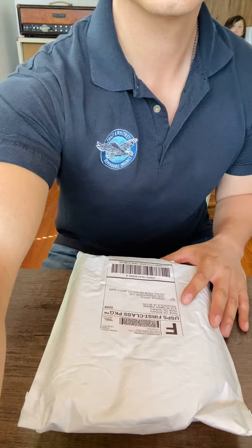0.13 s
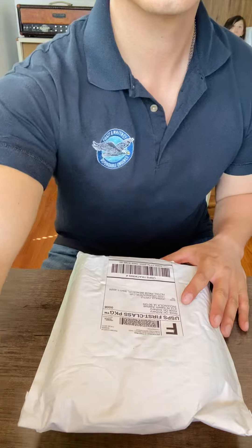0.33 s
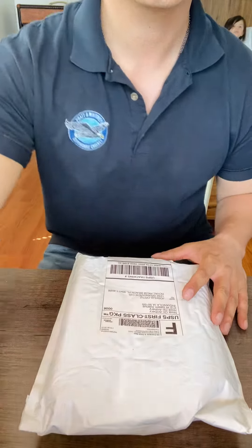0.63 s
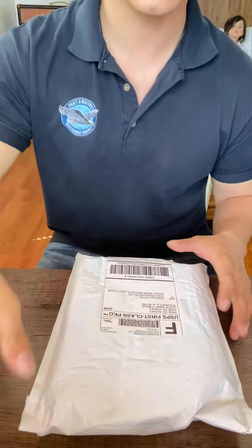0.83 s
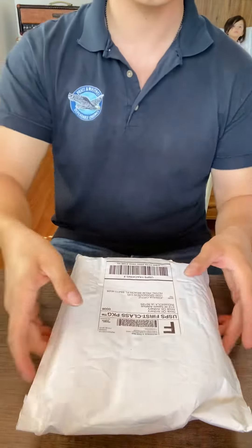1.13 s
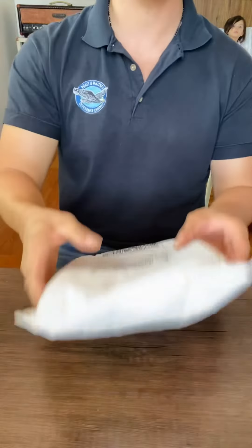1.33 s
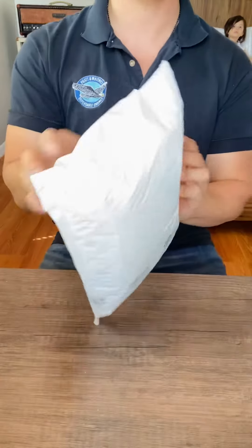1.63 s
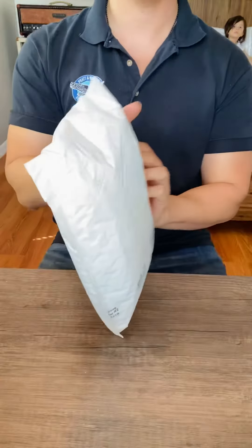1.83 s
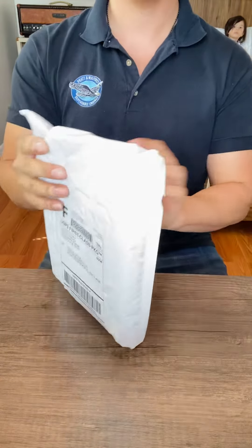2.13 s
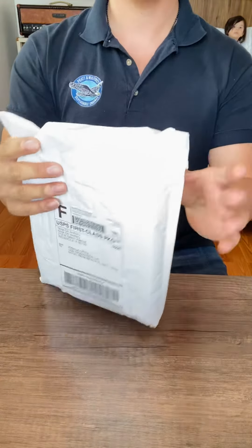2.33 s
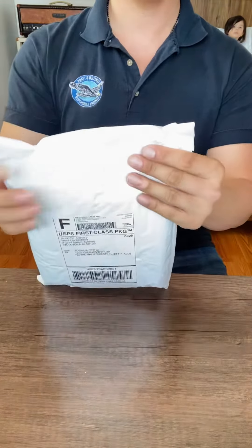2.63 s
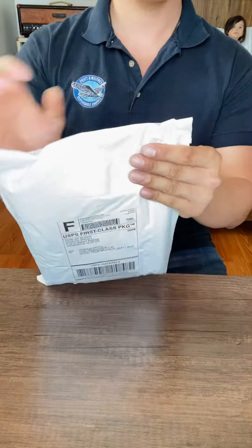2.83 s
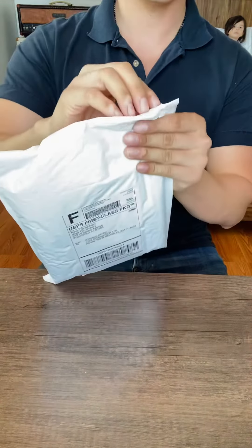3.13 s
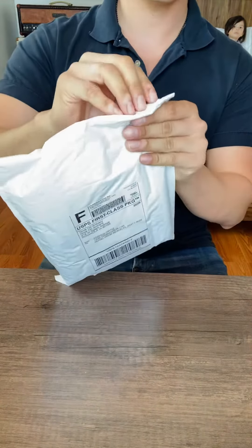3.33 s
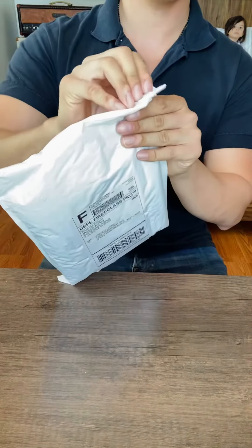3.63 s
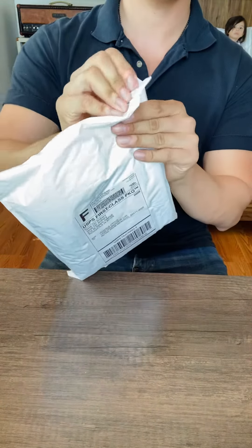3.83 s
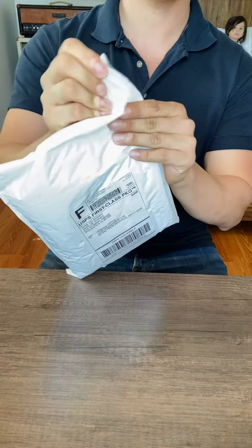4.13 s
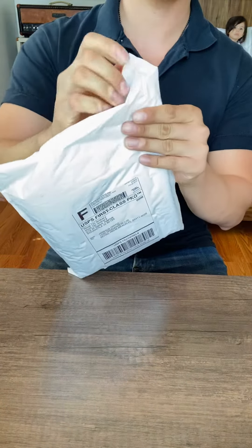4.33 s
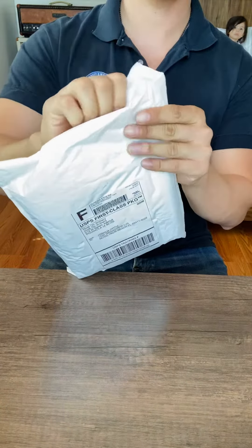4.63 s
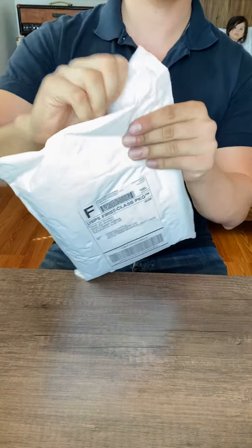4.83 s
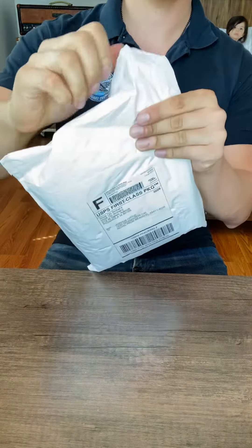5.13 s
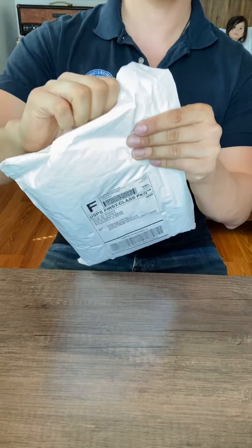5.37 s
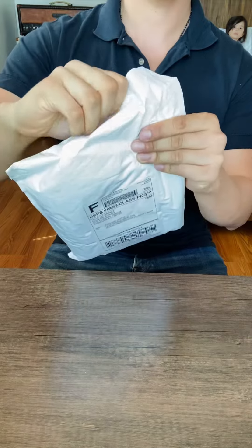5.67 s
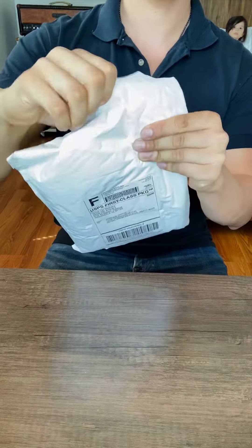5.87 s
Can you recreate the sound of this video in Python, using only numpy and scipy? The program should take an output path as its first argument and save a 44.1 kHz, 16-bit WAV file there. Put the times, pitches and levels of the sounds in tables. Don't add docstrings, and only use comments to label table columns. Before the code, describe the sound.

After a nearly quiet first second with two small knocks and a whisper of cloth, stiff plastic film crackles and snaps irregularly as hands turn a padded parcel. Fingers pick at the edge, then rip the seam in three short rasping bursts, the later two with soft thumps and hollow air pops. Close and bright, with a short small-room tail.

```python
import sys
import numpy as np
from scipy import signal
from scipy.fft import rfft, irfft
from scipy.io import wavfile
from scipy.ndimage import uniform_filter1d

SR = 44100
rng = np.random.default_rng(int(sys.argv[2]) if len(sys.argv) > 2 else 0)


def inscribe(sig):
    pcm = np.round(np.clip(np.atleast_2d(sig).T, -1, 1) * 32767)
    wavfile.write(sys.argv[1], SR, pcm.astype(np.int16))


def volts_from_decibels(level):
    exponent = np.asarray(level, float) / 20
    return 10 ** exponent


N = 264600

# [f/Hz, level/dB per Hz]
ROOM_TONE = [(28, -16), (49, 4), (97, -1.5), (151, -10), (230, -19.5), (350, -20), (420, -39), (900, -47),
             (2000, -77)]
# [f/Hz, level/dB per Hz]
CLOTH_SPECTRUM = [(500, -3), (950, -13), (1350, -4.5), (1700, -7.5), (2200, -7.5), (7050, -13.5),
                  (13000, -29)]
# [t/s, level/dB]
SLEEVE_PASS = [
    (.04, -83.5),
    (.35, -86),
    (.46, -73),
    (.6, -64.5),
    (.8, -73.5),
    (.97, -80),
    (1.12, -78),
]
# [t/s, peak level/dB, pitch factor/1]
STAND_KNOCKS = [
    (0.0913, -32.5, 0.99),
    (0.189, -33.5, 0.9),
]
# [f/Hz, level/dB, t60/s]
STAND_MODES = [
    (278, 4, 0.058),
    (463, -5.5, 0.1),
    (610, -18, 0.087),
    (915, -16.5, 0.03),
]

# [f/Hz, level/dB per Hz]
FILM_SPECTRUM = [(400, -21), (800, -12.5), (1010, -8), (1370, -1.5), (1770, -4.5), (2030, -2), (2420, -7),
                 (3000, -5), (4100, -5), (5600, -6.5), (7500, -9.5), (10700, -16), (12200, -23.5),
                 (16000, -48)]
# [f/Hz, level/dB per Hz]
PADDING_SPECTRUM = [(88, -38), (150, 2), (177, -4), (334, 0.5), (440, -4), (640, -3), (1100, -8.5),
                    (1430, -10.5), (2420, -120)]
PATCH_PITCHES = [1300, 1500, 2000, 2670, 3300, 4200, 5400, 7300]

# [t/s, peak level/dB, ring f/Hz, relative brightness/dB]
EXTRA_BUCKLES = [(0.38, -63, 1920, -8), (1.113, -52, 1500, -20), (1.17, -34, 1650, -18),
                 (1.625, -29, 1390, -21), (1.529, -35, 1300, -13), (4.846, -27, 3000, -16),
                 (5.6767, -16, 2600, -1), (4.0237, -19, 5640, -12), (4.842, -16.5, 4100, -7),
                 (5.087, -25, 1400, -20), (5.094, -18.5, 2000, -18), (5.5405, -19.5, 3920, 1),
                 (5.6538, -24, 4180, -17), (5.662, -21, 1800, -14), (5.6718, -12, 4100, -7)]
# [t/s, peak level/dB, ring f/Hz, relative brightness/dB]
LIFT_BUCKLES = [(1.1342, -36, 1850, -14), (1.1827, -22.5, 3620, -11), (1.1945, -21, 1640, -2.5),
                (1.3155, -33, 1250, -21), (1.3607, -30, 1120, -8), (1.3954, -22, 1460, -24),
                (1.4115, -25, 5200, -11), (1.4362, -27, 5790, -5), (1.4442, -20.5, 4940, -8),
                (1.475, -26, 5530, -5), (1.5003, -17.5, 3950, -8), (1.54, -19, 2200, -9),
                (1.6343, -32, 1970, -5.5), (1.6635, -31.5, 3300, -3.5), (1.8292, -32, 1410, -10),
                (2.0098, -21, 1350, -29), (2.0167, -21, 2040, -23), (2.0388, -26, 1580, -22.5),
                (2.0559, -13, 1470, -20), (2.1874, -20, 5760, -12), (2.1929, -25.5, 2100, -11),
                (2.3534, -18, 1320, -12.5), (2.393, -30, 5630, -17)]
# [t/s, peak level/dB, ring f/Hz, relative brightness/dB]
TURN_BUCKLES = [(2.52, -21, 7300, 0), (2.5369, -21, 1370, -10), (2.62, -24, 2820, -10),
                (2.6483, -22, 6800, -6), (2.665, -25, 1610, -19), (2.6896, -18.5, 1360, -13),
                (2.7111, -13.5, 1240, -7), (2.719, -16, 5300, -7), (2.7677, -28, 3070, -3),
                (2.802, -20.5, 2900, -13), (2.8472, -29, 1500, -17), (2.8985, -29.5, 1450, -13),
                (2.9127, -33.5, 2710, -2), (3.02, -25.5, 1310, -20), (3.047, -33, 3080, -25),
                (3.074, -26.5, 1450, -19), (3.103, -22, 1320, -6.5), (3.1172, -14, 5860, -11.5),
                (3.1265, -21, 3020, -15), (3.182, -29, 4170, -26), (3.219, -36, 3100, 0),
                (3.297, -31, 2950, -11), (3.3465, -24.5, 3070, -7.5), (3.3786, -21.5, 4320, -13),
                (3.3994, -20.5, 4300, -9), (3.4154, -32, 4300, -8)]
# [t/s, peak level/dB, ring f/Hz, relative brightness/dB]
PICK_BUCKLES = [(3.564, -32.5, 2900, -9), (3.6144, -18, 6700, -7), (3.647, -27, 3060, -14),
                (3.705, -20.5, 2880, -14), (3.7208, -21, 1920, -12), (3.7798, -17, 4200, -6),
                (3.7882, -19, 4150, -8), (3.85, -25, 5270, -2), (3.865, -30, 3020, -9),
                (3.9374, -15, 5100, 1.5), (3.9572, -28, 3380, -12), (3.9688, -17.5, 3160, -15.5),
                (3.981, -20, 1300, -19.5), (4.3279, -23.5, 3000, -17), (4.3322, -22.5, 1450, -5),
                (4.3982, -27.5, 3970, -11), (4.4326, -24, 3580, -17), (4.5002, -27, 1242, -21)]
# [t/s, peak level/dB, ring f/Hz, relative brightness/dB]
PEEL_BUCKLES = [(4.6043, -29, 1470, -16), (4.6264, -21.5, 2080, -7), (4.6361, -24.5, 3530, -13),
                (4.691, -20, 3320, -10), (4.785, -20, 3620, -11), (4.799, -19.5, 3270, -13.5),
                (4.821, -18.5, 4700, -3), (5.0638, -19, 5200, -10.5), (5.1156, -14.5, 2030, -27),
                (5.3016, -29.5, 1385, -8), (5.3157, -27, 1440, -19), (5.3404, -13.5, 3100, -6),
                (5.3696, -29.5, 1610, -33), (5.4174, -25.5, 4820, 5), (5.4487, -30, 2090, -18),
                (5.478, -29, 1480, -23), (5.492, -36, 1370, -18), (5.511, -33, 2000, -23),
                (5.539, -23.5, 1540, -6), (5.5671, -29, 4020, -19), (5.6122, -27, 1400, -7),
                (5.6321, -23.5, 2160, -6)]
# [t/s, peak level/dB, ring f/Hz, relative brightness/dB]
SMALL_BUCKLES = [(1.2846, -37, 1600, 4), (1.322, -35, 3530, -21), (1.3522, -29.7, 4240.0, -6),
                 (1.549, -24, 2840.0, -15), (1.7006, -33, 1420.0, -19), (1.8722, -33.5, 2070, -17),
                 (1.9615, -28.5, 1380.0, -29), (2.184, -39, 2110.0, -5), (2.2005, -37.5, 1460.0, -20),
                 (2.2872, -34, 1510.0, -13.0), (2.3165, -30, 1440.0, -20), (2.541, -21.5, 1230.0, -16),
                 (2.6015, -23, 5360.0, -3), (2.672, -24, 1480, -12), (2.6843, -27, 1210.0, -7.0),
                 (2.744, -30, 4610.0, 3), (2.8161, -31.3, 7940, -7), (3.1435, -30, 1520, -17),
                 (3.1763, -32, 4070.0, -12.0), (3.2252, -41, 3100.0, -9.0), (3.2453, -40, 5400.0, -7.0),
                 (3.2765, -33.4, 2100, -11.0), (3.2918, -34, 2000.0, -7), (3.3941, -27, 5060.0, -8),
                 (3.4627, -34, 2780.0, -8), (3.6587, -35, 3790.0, -15), (3.6817, -36.5, 1960.0, -9.0),
                 (3.9102, -32, 4240.0, -5), (3.991, -25.2, 1460.0, -17), (4.2822, -30, 3060.0, -9),
                 (4.426, -30.5, 1640.0, -17), (4.545, -40, 4340, -4), (4.6, -37, 1400.0, -18.0),
                 (4.6564, -32.7, 2050, -11), (4.716, -23, 2780.0, -25), (4.8042, -27, 1340.0, -16),
                 (4.8316, -27, 2910.0, -5), (5.2799, -30, 1350, -13), (5.351, -24, 2540.0, -16),
                 (5.361, -29, 1530, -24), (5.4064, -28, 1280, -28), (5.436, -31, 1260, -19),
                 (5.5317, -32, 1310.0, -13), (5.5506, -24, 1980.0, -21), (5.5745, -34, 1770.0, -14.0),
                 (5.6007, -34, 7150.0, -4.0), (5.6181, -36, 1510.0, -12), (5.9976, -29, 1490.0, -21)]

# [t/s, peak level/dB, f/Hz, t60/s]
JOLTS = [(0.612, -49, 205, 0.13), (1.146, -38.5, 219, 0.075), (0.598, -50, 306, 0.11),
         (1.141, -39, 359, 0.11), (1.827, -37, 89.5, 0.062), (2.052, -41, 130, 0.21),
         (2.554, -34, 85, 0.086), (2.522, -45, 154, 0.052), (3.297, -42, 520, 0.055), (3.613, -40, 91, 0.1),
         (3.805, -35.5, 325, 0.033), (4.104, -36, 329, 0.15), (4.339, -31.5, 121, 0.034),
         (4.853, -30, 199, 0.19), (4.889, -20.5, 324, 0.052), (5.119, -23.5, 124, 0.044),
         (5.679, -18, 216, 0.025), (5.695, -22.5, 317, 0.12), (5.935, -19, 106, 0.032)]
# [t/s, peak level/dB, f/Hz]
AIR_POPS = [(0.6107, -51, 364), (0.6277, -49, 370.0), (1.3555, -35, 790), (1.4166, -31, 650),
            (2.0558, -31.5, 683), (2.7115, -36, 457), (2.847, -45, 630), (3.0853, -41.5, 570),
            (3.2977, -47.5, 517), (3.5768, -49, 370.0), (3.7047, -48, 586), (3.7345, -43.4, 733),
            (4.0058, -42, 604), (4.1929, -43, 765), (4.334, -41.5, 370.0), (4.3974, -45.5, 367),
            (4.4314, -45, 980), (4.5015, -45.5, 374), (4.6312, -45, 820.0), (4.852, -23.1, 354),
            (4.88, -23.5, 450.0), (5.1146, -24.5, 893), (5.2094, -47.2, 724), (5.3409, -35, 960),
            (5.3625, -34.5, 370.0), (5.5383, -43, 507), (5.549, -44, 1040), (5.6333, -43.5, 694),
            (5.6808, -17.5, 365), (5.8894, -34.5, 880.0)]

# [t of most force/s, crackle level/dB, rise/s per 10 dB, fall/s per 10 dB,
# relative padding level/dB]
HANDLING_SQUEEZES = [(1.15, -51, 2, 0.32, 4.5), (1.439, -41, 0.3, 0.2, -5), (1.6, -43, 1.2, 0.17, -31),
                     (1.83, -49.5, 0.33, .25, -3), (2.062, -33.5, 0.12, 0.0548, -7),
                     (2.263, -44, 0.47, 0.3, -7.5), (2.55, -31.5, 0.0252, 0.07, -12.5),
                     (2.687, -37, 0.21, 0.12, -9), (2.848, -54.5, 4, 0.45, -4),
                     (3.112, -39.5, .06, 0.15, -9), (3.31, -44.5, -0.02, 0.09, -8),
                     (3.402, -45, 0, 0.07, -6.5), (3.621, -41.5, -0.12, 0.83, -12.5),
                     (3.818, -34.5, 0.09, 0.25, -16)]
# [t of most force/s, crackle level/dB, rise/s per 10 dB, fall/s per 10 dB,
# relative padding level/dB]
TEARING_SQUEEZES = [(3.981, -34, 0.024, 0.074, -18), (4.053, -23, 0.0085, 0.092, -20),
                    (4.24, -39.5, 0.11, 0.14, -25), (4.334, -37, 0.042, 0.018, -5.5),
                    (4.505, -45.5, 0.079, 0.021, -8), (4.642, -43.5, 0.086, 0.02, -6.5),
                    (4.723, -34.5, 0.042, 0.17, -7.5), (4.878, -22.5, 0.031, 0.024, -2),
                    (5.002, -41, 0.1, 0.21, -12), (5.121, -29, 0.036, 0.0057, 0.5),
                    (5.297, -40.5, 0.021, 0.18, -3), (5.577, -43, 0.14, 0.15, -8.5),
                    (5.69, -24, 0.011, 0.045, -0.5), (5.867, -36, 0.17, 0.1, -11.5),
                    (5.929, -32.5, 0.039, 0.028, 2)]

# [t/s, peak level/dB, ring f/Hz, relative brightness/dB]
FIRST_PULL = [(4.0457, -9, 4760.0, 2), (4.0495, -12.8, 4890.0, -14), (4.0529, -14, 2100, -11),
              (4.0564, -6.5, 5570, -5.5), (4.063, -20, 3880.0, 4), (4.067, -11.5, 5750.0, -8),
              (4.0704, -7, 3700, -4), (4.0742, -8.5, 1410, -4), (4.0779, -5, 2990.0, -11.0),
              (4.0824, -5.5, 3200, -6), (4.0871, -6, 3620.0, -5.0), (4.0896, -9.5, 2950, -11.0),
              (4.0963, -9.5, 2900, -4), (4.1016, -6.5, 3580, -11), (4.1047, -8.5, 6740, -9),
              (4.1074, -10.5, 5750, -9), (4.1108, -8.5, 3350, -2), (4.1166, -10, 5900, -1)]
# [t/s, peak level/dB, ring f/Hz, relative brightness/dB]
SECOND_PULL = [(4.853, -2.5, 2960, -7), (4.8576, -6, 3040, -8.0), (4.8626, -4, 1340, -14),
               (4.8681, -6.5, 2940, -7), (4.872, -5, 3000, -4), (4.8758, -7.1, 3100, -15),
               (4.879, -5.5, 3120, -21), (4.8823, -5, 2900, -8), (4.8847, -16, 3120.0, -4),
               (4.8881, -3.3, 1900, -6), (4.8955, -4.5, 1980, -9)]
# [t/s, peak level/dB, ring f/Hz, relative brightness/dB]
THIRD_PULL = [(5.6797, -1.5, 5100, -10.5), (5.6842, -4.5, 4200, -14), (5.6872, -8, 5270, -5.0),
              (5.6908, 0.5, 3270.0, -10), (5.695, -4.4, 4560, -4), (5.6991, -2.5, 4700, -6.5),
              (5.7057, -5.5, 1800, -11), (5.7107, -7.8, 1780, -12.0), (5.7173, -13.6, 3600.0, -18),
              (5.7228, -8.5, 1920, -13.0)]
# [t/s, peak level/dB, ring f/Hz, relative brightness/dB]
FINAL_TUG = [(5.8866, -22.5, 1400, -17), (5.8907, -20.5, 1910, -9.0), (5.8993, -27, 1890.0, -16),
             (5.902, -18.5, 3100.0, -12), (5.9061, -17.5, 3190.0, -5), (5.9137, -18.5, 1510, -16),
             (5.9197, -24, 3190.0, -1), (5.9226, -20, 1960.0, -10.0), (5.9247, -30, 2780, -3),
             (5.93, -20.5, 1320, -9)]
# [f/Hz, width/Hz, level/dB]
SEAM_MODES = [
    (1340, 350, -28),
    (3120, 35, -21.5),
]

# [f/Hz, t60/s]
ROOM_DECAY = [(500, 0.38), (3000, 0.61), (6000, 0.42), (12000, 0.39)]
# [f/Hz, side minus mid level/dB]
STEREO_WIDTH = [(90, -27.5), (200, -18.5), (350, -12.5), (700, -4.5), (1400, -11.5), (2800, -5.5),
                (5500, -6.5), (6800, -8.5), (9000, -5.5), (13000, 8)]

ROOM_TONE_DB = -54
GRIP_S, GRIP_DB_PER_S = 1.145, 698
EASE = 1.3
PADDING_STEEP = 1.42
BRIGHT_DB, BRIGHT_PER_DB = 0.45, 0.45
POP_RISE_S, POP_T60_S, POP_PAIR = 0.0009, 0.03, 2
START_S, EDGE_HZ = 0.036, 16300


def evened(x):
    return x / np.sqrt(np.mean(x ** 2) + 1e-20)


def read(points, hz):
    f, value = np.transpose(points)
    return np.interp(np.log(hz + 1), np.log(f + 1), value)


def along(rows):
    s, *columns = np.transpose(rows)
    return [np.interp(np.arange(N) / SR, s, c) for c in columns]


def add(mix, s, sound):
    part = mix[round(s * SR):][:len(sound)]
    part += sound[:len(part)]


def causal(db):
    log_gain = np.log(volts_from_decibels(np.maximum(db, -100)))
    mirrored = np.r_[log_gain, log_gain[-2:0:-1]]
    phase = -signal.hilbert(mirrored).imag[:len(db)]
    return irfft(np.exp(log_gain + 1j * phase))


def colour(x, points):
    curve_db = read(points, np.fft.rfftfreq(4096, 1 / SR))
    return signal.oaconvolve(x, causal(curve_db)[:2048], axes=-1)[:N]


def grains(per_s, spread_db, burst_s):
    size = volts_from_decibels(spread_db * np.minimum(rng.exponential(1, N), 4))
    size = size * (rng.random(N) < per_s / SR)
    envelope = signal.lfilter([1], [1, -np.exp(-1 / (burst_s * SR))], size)
    return envelope * rng.standard_normal(N)


def hum():
    swell = evened(uniform_filter1d(rng.standard_normal(N), 4000))
    rumble = evened(colour(rng.standard_normal(N), ROOM_TONE))
    return volts_from_decibels(ROOM_TONE_DB + 0.7 * swell) * rumble


def sleeve():
    hiss = evened(colour(grains(3400, 1.0, 0.0029), CLOTH_SPECTRUM))
    passing = np.arange(N) < 1.15 * SR
    return volts_from_decibels(along(SLEEVE_PASS)[0]) * passing * hiss


def knocks():
    out, t = np.zeros(N), np.arange(8000) / SR
    onset = 1 - np.exp(-(t / 0.004) ** 2)
    for s, db, factor in STAND_KNOCKS:
        ring = sum(volts_from_decibels(d - 60 * t / t60) * np.sin(2 * np.pi * hz * factor * t) for hz, d, t60 in STAND_MODES)
        add(out, s - 0.003, volts_from_decibels(db) * ring * onset)
    return out


def snaps(rows, burst_s, rise_s, ring_db, sharp, trim_db, even):
    hz, out = np.fft.rfftfreq(1024, 1 / SR), np.zeros(N)
    t = np.arange(400) / SR
    burst = np.exp(-t / burst_s) * (1 - np.exp(-t / rise_s))
    for s, db, ring_hz, bright_db in rows:
        cracks = rng.standard_normal(400)
        ring = ring_db / (1 + (sharp * np.log((hz + 1) / ring_hz)) ** 2)
        tilt = (bright_db + 10.5) * np.clip(np.log2((hz + 1) / 4500), 0, 1)
        drive = rfft(cracks * burst, 1024)
        drive = drive / abs(drive) ** even
        film = causal(read(FILM_SPECTRUM, hz) + ring + tilt)
        snap = irfft(drive * rfft(film))[:700]
        add(out, s, volts_from_decibels(db + trim_db) * snap / abs(snap).max())
    return out


def buckles():
    rows = LIFT_BUCKLES + TURN_BUCKLES + PICK_BUCKLES + PEEL_BUCKLES + EXTRA_BUCKLES + SMALL_BUCKLES
    return snaps(rows, burst_s=0.0016, rise_s=0.00019, ring_db=9, sharp=6.7, trim_db=-1.44, even=0.46)


def thumps():
    out, t = np.zeros(N), np.arange(8000) / SR
    onset = 1 - np.exp(-t / 0.0032)
    for s, db, hz, t60 in JOLTS:
        turns = hz * (t + 0.0029 * (1 - np.exp(-t / 0.0022)))
        add(out, s, volts_from_decibels(db + 4.5 - 60 * t / t60) * np.sin(2 * np.pi * turns) * onset)
    return out


def pops():
    out, t = np.zeros(N), np.arange(3000) / SR
    onset = 1 - np.exp(-t / POP_RISE_S)
    for s, db, hz in AIR_POPS:
        pair = np.sin(2 * np.pi * hz * t) + 0.87 * np.sin(2 * np.pi * hz * POP_PAIR * t)
        add(out, s, volts_from_decibels(db + 3.5 - 60 * t / POP_T60_S) * pair * onset)
    return out


def effort():
    squeezes = np.transpose(HANDLING_SQUEEZES + TEARING_SQUEEZES)
    s, db, rise_s, fall_s, padding_db = squeezes[:, :, None]
    t = np.arange(0, N + 64, 64) / SR
    late = t - s
    eased_db = -10 * np.where(late < 0, -late / abs(rise_s), late / abs(fall_s)) ** EASE
    grip_db = GRIP_DB_PER_S * np.minimum(t - GRIP_S, 0)
    levels = []
    for each_db in (db + eased_db, db + padding_db + PADDING_STEEP * eased_db):
        total_db = 10 * np.log10((volts_from_decibels(each_db) ** 2).sum(0) + 1e-30)
        levels.append(np.interp(np.arange(N) / SR, t, grip_db + total_db))
    return levels


def patches(per_s, spread_db, burst_s, ring_db, width):
    out = 0
    for hz in PATCH_PITCHES:
        x = grains(per_s / len(PATCH_PITCHES), spread_db, burst_s)
        ring = signal.lfilter(*signal.iirpeak(hz, 1 / width, fs=SR), x)
        out = out + x + volts_from_decibels(ring_db) * ring
    return out


def crackle():
    film_db, padding_db = effort()
    clumps = volts_from_decibels(1.37 * evened(uniform_filter1d(rng.standard_normal(N), 700)))
    film = patches(1500, 2.1, 0.002, ring_db=6, width=0.15) * clumps
    film = evened(colour(film, FILM_SPECTRUM))
    high = signal.sosfilt(signal.butter(2, 5000 / SR * 2, "high", output="sos"), film)
    film = film + (volts_from_decibels(BRIGHT_DB + BRIGHT_PER_DB * (film_db + 37)) - 1) * high
    padding = evened(colour(grains(900, 1.8, 0.00095) * clumps, PADDING_SPECTRUM))
    return volts_from_decibels(film_db - 4.5) * film + volts_from_decibels(padding_db - 3.0) * padding


def tearing():
    rows = FIRST_PULL + SECOND_PULL + THIRD_PULL + FINAL_TUG
    return snaps(rows, burst_s=0.0018, rise_s=0.00022, ring_db=10.5, sharp=6.9, trim_db=-0.43, even=0.71)


def seam(tear):
    t, ring = np.arange(2000) / SR, 0
    for hz, width, db in SEAM_MODES:
        gain = volts_from_decibels(db) * np.sqrt(2 * np.pi * width / SR) * 2
        ring = ring + gain * np.exp(-np.pi * width * t) * np.sin(2 * np.pi * hz * t)
    return signal.oaconvolve(tear, ring)[:N]


def tails(length_s, first_s):
    taps = np.zeros((2, SR))
    at = np.arange(0, SR - 20, 20) + rng.integers(0, 20, (2, (SR - 1) // 20))
    np.put_along_axis(taps, at, rng.choice([-1., 1.], at.shape), 1)
    taps *= 1 - np.exp(-(np.arange(SR) / SR / first_s) ** 2)
    hz, t, z = signal.stft(taps, SR, nperseg=256)
    decay = volts_from_decibels(-60 * t / (length_s * read(ROOM_DECAY, hz)[:, None]))
    tail = signal.istft(z * decay, SR, nperseg=256)[1]
    return tail / np.linalg.norm(tail[0])


def room(x):
    turn = 2 * np.pi * 31 * np.arange(N) / SR
    out = 0
    for k in range(3):
        share = np.sqrt(2 / 3) * np.cos(turn + k * 2 * np.pi / 3)
        out = out + signal.fftconvolve((x * share)[None], tails(0.7, first_s=0.00047), axes=1)[:, :N]
    return out


def scene():
    tear = tearing()
    near = buckles() + tear + crackle() + thumps() + knocks() + pops() + sleeve()
    far, house = room(near), hum()
    near = near + seam(tear)
    mid = near + volts_from_decibels(-8.0) * far[0] + house
    hz = np.fft.rfftfreq(N, 1 / SR)
    lag = -1j * volts_from_decibels(read(STEREO_WIDTH, hz))
    lean = 0.12 * hz / (hz + 250)
    side = irfft(lag * rfft(near + house + volts_from_decibels(-2.5) * far[1]) + lean * rfft(near), N)
    return np.array([mid + side, mid - side])


def starved(x, lo_hz, hi_hz, rise_db, loud_db=-0, count=4):
    edges = np.linspace(lo_hz, hi_hz, count + 1)
    hz, spectrum = np.fft.rfftfreq(N, 1 / SR), rfft(x)
    above = np.clip((hz - edges[:, None]) / 200, 0, 1)
    for share in above[:-1] - above[1:]:
        band = irfft(spectrum * share, N)
        power = band ** 2
        thrift_db = rise_db + 1.5 * np.repeat(rng.standard_normal(N // 1024 + 1), 1024)[:N]
        attack = uniform_filter1d(power, size=64) > volts_from_decibels(2 * thrift_db) * uniform_filter1d(power, size=2048)
        loud = uniform_filter1d(power, size=512) > volts_from_decibels(2 * loud_db)
        kept = 1. * (uniform_filter1d(1. * (attack | loud), size=700) > 1e-6)
        x = x - band * (1 - uniform_filter1d(kept, size=128))
    return x


def low_pass(x):
    return signal.sosfilt(signal.butter(12, 16480, fs=SR, output="sos"), x)


def record(dry):
    opened = dry * (np.arange(N) > START_S * SR)
    left, right = 1.4 * np.tanh(opened / 1.4)
    mid = starved((left + right) / 2, 10900, 13000, rise_db=2.5, loud_db=-54, count=2)
    mid = starved(mid, 11660, 17000, rise_db=9.5, loud_db=-47)
    side = starved((left - right) / 2, 5700, 8000, rise_db=7, count=3)
    side = starved(side, 14200, 17000, rise_db=2.0)
    edge = signal.firwin(255, EDGE_HZ, fs=SR)[None]
    limited = signal.oaconvolve([mid + side, mid - side], edge, "same")
    return low_pass(limited)


dry = scene()
out = record(dry)
inscribe(out)
```